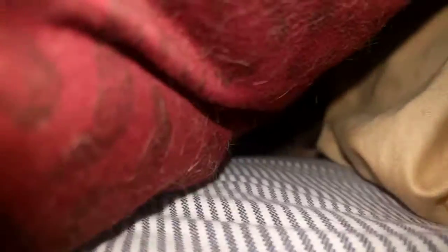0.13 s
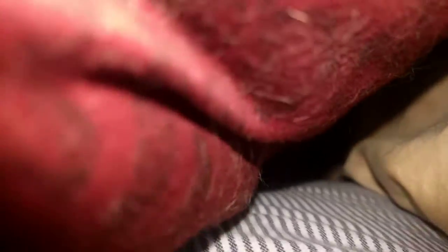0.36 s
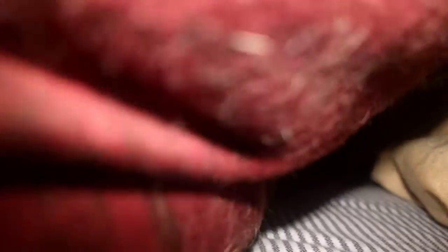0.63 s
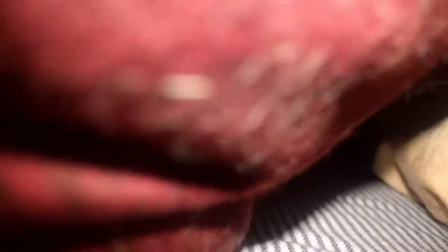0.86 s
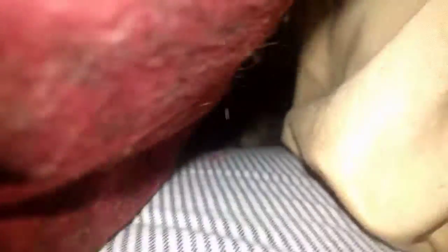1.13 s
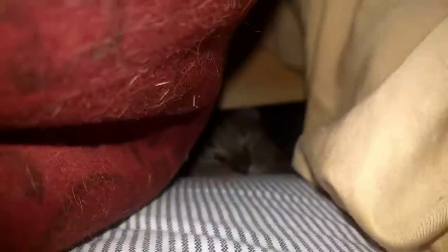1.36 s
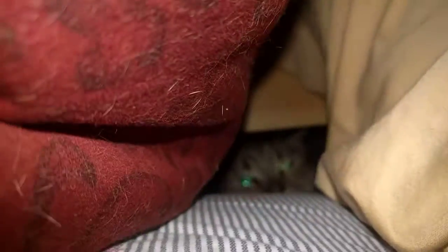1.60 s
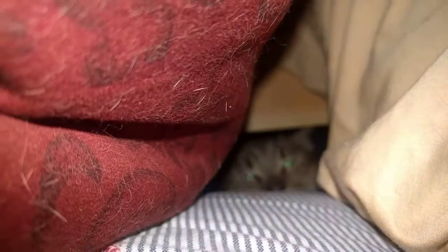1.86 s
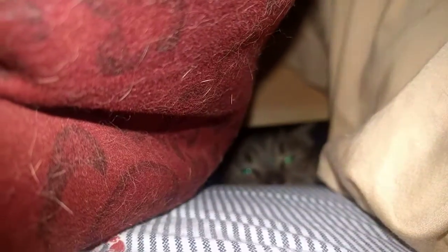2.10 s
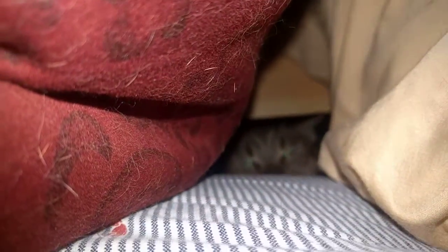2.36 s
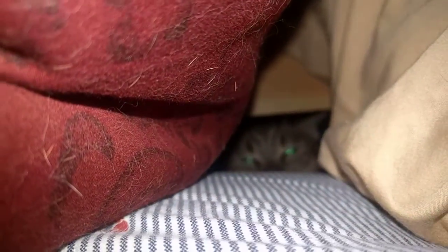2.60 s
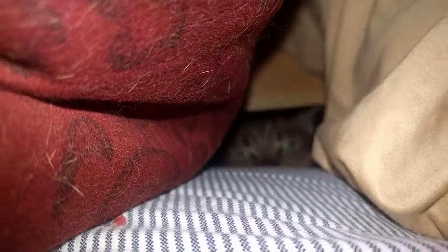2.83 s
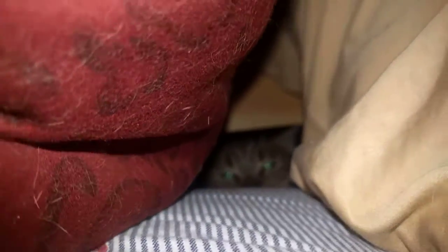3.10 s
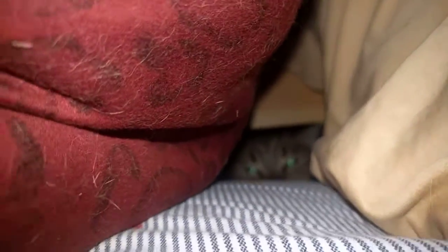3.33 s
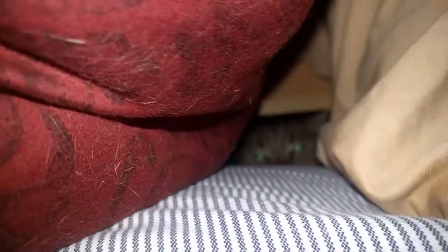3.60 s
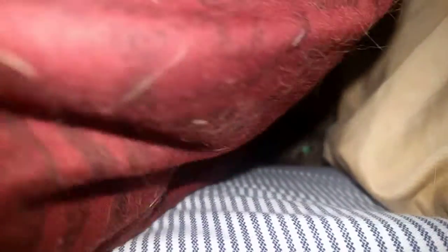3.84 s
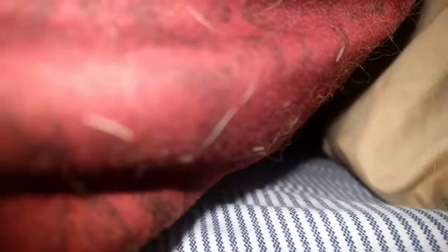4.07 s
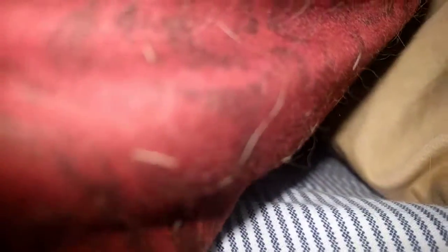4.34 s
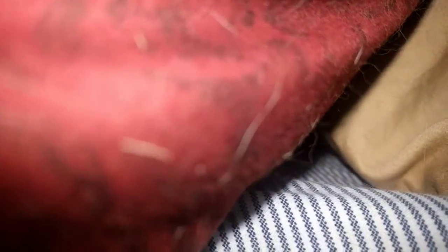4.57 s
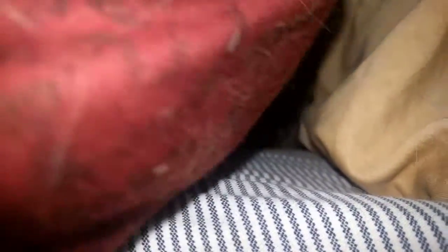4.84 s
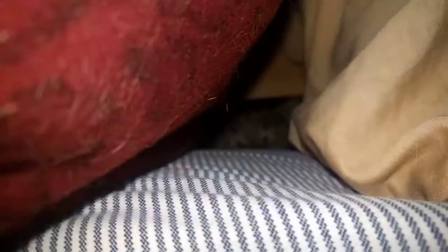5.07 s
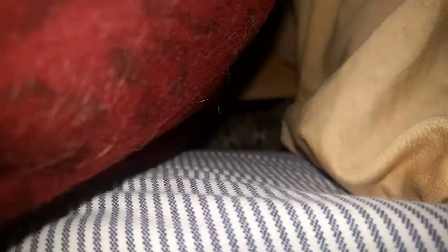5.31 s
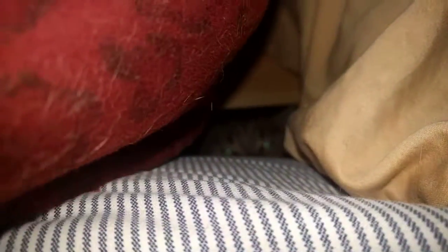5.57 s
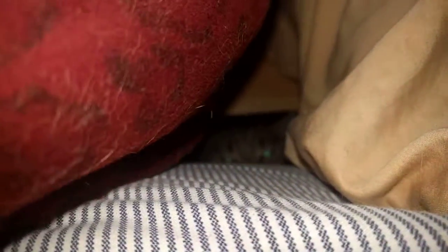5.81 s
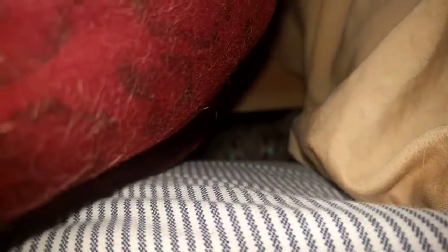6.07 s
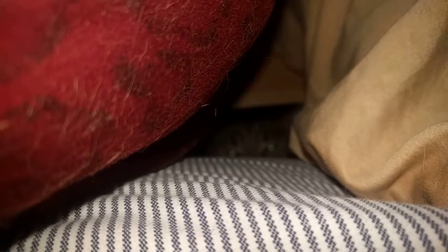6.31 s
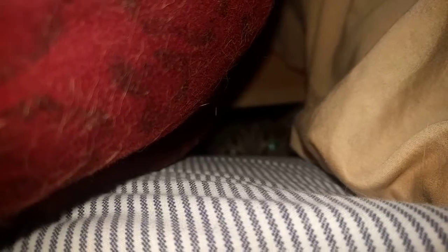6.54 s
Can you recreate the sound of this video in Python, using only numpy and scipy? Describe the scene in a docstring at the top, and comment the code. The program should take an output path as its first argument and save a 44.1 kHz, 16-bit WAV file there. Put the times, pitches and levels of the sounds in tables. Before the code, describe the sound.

Pillows and sheets rustle and scrape close against a small handheld microphone, pause into near silence, then shift again with one sharp hard tap.

```python
"""On a bed in a quiet room: pillows and sheets drag along a small hand-held camera while a cat shifts in a gap.
Bedding slides as plucked-fibre noise, ringing in the pocket between the pillows under a hiss from the weave.
Cloth scrapes and snaps on the case as noise and short forces through its resonances; bumps push the microphone.
Beneath lie the dull rumble of the camera rocking, steady room air, a low hum and a faint electric whine."""
import sys
import numpy as np
from scipy import signal
from scipy.fft import rfft, irfft, next_fast_len
from scipy.io import wavfile
from scipy.ndimage import uniform_filter1d, map_coordinates

SR = 44100
rng = np.random.default_rng(int(sys.argv[2]) if len(sys.argv) > 2 else 0)


def gain_from_db(level_db):
    """Convert decibel levels to linear amplitude factors (20 dB per decade)."""
    decades = np.asarray(level_db, float) / 20
    return 10 ** decades


def transcribe(u):
    """Save the signal u as a 16-bit wav file named by the first command-line argument.

    u: samples, shape (n,) or (channels, n), limited to [-1, 1]; the rate is SR.
    q: integer samples, one column per channel.
    """
    v = np.clip(np.atleast_2d(u).T, -1, 1)
    q = np.round(v * 32767).astype(np.int16)
    wavfile.write(sys.argv[1], SR, q)


N = 294630  # length in samples

# Bedding sliding near the microphone. Each row: start in seconds, build-up in seconds, dying in seconds,
# relative peak level in dB, weave hiss over the swish in relative dB.
SWISHES = [(-.1, 0.053, 0.12, -37, -2), (0.089, .022, 0.015, -29.5, -5.5), (0.147, 0.06, 0.022, -31.5, -10),
           (.2, 0.066, 0.19, -38, -5.5), (0.399, 0.17, 0.078, -37.5, -2.5),
           (0.551, 0.11, 0.089, -34.5, -5.5), (0.768, 0.14, 0.34, -35.5, -0.5),
           (.96, 0.12, 0.11, -35.5, -0.5), (1.13, 0.058, 0.12, -41.5, -1), (1.25, 0.056, 0.1, -49.5, -11),
           (1.36, 0.2, 0.075, -49.5, -0.5), (1.56, 0.056, 0.21, -61.5, -16), (1.81, 0.036, 0.029, -60, 0),
           (1.91, 0.042, .06, -59.5, -6), (1.98, 0.13, .27, -59.5, -6), (2.701, 0.14, 0.017, -41, -10),
           (2.93, 0.035, 0.095, -39, 1.5), (2.97, 0.08, 0.046, -38, -3), (3.102, 0.11, 0.12, -44, -1),
           (3.339, 0.076, 0.053, -48.5, 2), (3.51, 0.057, 0.21, -50, -3.5), (3.601, .165, 0.045, -46, -4),
           (3.818, 0.078, 0.051, -41, -6), (3.989, 0.038, 0.08, -43, -8), (4.05, 0.08, 0.13, -44.5, -12),
           (4.211, 0.053, 0.024, -40.5, -3.5), (4.27, 0.032, 0.073, -53, -2.5),
           (4.37, 0.1, 0.055, -60.5, 4.5), (4.49, 0.063, 0.083, -45, -6), (4.6, 0.16, 0.068, -40, -4),
           (4.85, 0.082, 0.051, -51, -7), (4.923, 0.01, 0.035, -38, -2), (5.28, 0.035, 0.045, -57, -3.5),
           (5.35, 0.04, 0.17, -60.5, 2)]
BUILD_BEND, DYING_BEND = 0.74, 0.77  # powers of the quarter sine that a swish rises and falls along
REST_DB, REST_HISS_DB = -68.5, 0  # the bedding creeping between swishes
# Cloth keeps settling after a swish: time constant, level against the swish and against its hiss.
SETTLE_S, SETTLE_DB, SETTLE_HISS_DB = 0.065, -12.5, -8.5
# Resonances of the pocket between the pillows. Each row: frequency in Hz, width in Hz, relative level in dB.
POCKET = [(2034, 1000, -10), (2836, 1250, -6)]
# Colour of the weave hiss. Each row: frequency in Hz, relative level in dB per Hz.
HISS = [(2500, -14.5), (4000, -3.5), (6000, -5.5), (8000, -18.5), (11000, -38)]
# Peak of the weave hiss with a wide gap between the pillows: frequency in Hz, width in Hz, gain in dB.
GAP_WIDE = (4400, 1100, 2.3)
# The same peak with a narrow gap: frequency in Hz, width in Hz, gain in dB.
GAP_NARROW = (4830, 450, 3.4)
# How narrow the gap is. Each row: time in seconds, narrowness from 0 to 1.
GAP = [(0.6, 0.6), (1.05, 0.9), (2.8, 0.15), (3.7, 0.3), (4.25, 0), (4.4, 0.9)]
# Colour of the fine fizz over the hiss. Each row: frequency in Hz, relative level in dB per Hz.
FIZZ = [(4000, -8.5), (7000, -2), (9800, -9.5), (11500, -9), (16000, -16)]
# Fizz against a swish of -45 dB with hiss at 0 dB, dB per dB of hiss, power of the swish level it follows.
FIZZ_DB, FIZZ_GROWS, FIZZ_POWER = -13, 0.69, 0.87
# Cloth dragging on the case itself. Each row: start in seconds, length in seconds, relative pressure in dB.
STROKES = [(0, 0.16, -36), (0.127, 0.33, -43.5), (0.408, 0.41, -41), (0.795, 0.079, -36.5),
           (0.827, 0.41, -46), (1.402, 0.17, -52), (2.602, 0.035, -47.5), (2.663, 0.025, -45),
           (2.682, 0.21, -43), (2.855, 0.32, -43), (2.958, 0.1, -45), (4.615, 0.24, -50.5),
           (4.923, 0.075, -33), (5.001, 0.09, -40.5), (5.107, 0.06, -49.5), (5.239, 0.05, -54),
           (5.83, 0.065, -52), (5.901, 0.058, -49.5), (5.998, 0.038, -59.5)]
# Resonances of the case under direct contact. Each row: frequency in Hz, width in Hz, relative level in dB.
CASE = [(1483, 270, 2.5), (2420, 1460, 1.5), (4100, 250, -13)]
# Cloth catching and letting go on the case. Each row: time in seconds, relative level in dB.
SLIPS = [(0.1773, -17.5), (0.2044, -22), (0.8007, -18.5), (0.8381, -17.5), (0.8877, -14.5), (1.9438, -41),
         (2.2016, -38), (2.2283, -41), (2.248, -41), (2.293, -41), (2.3086, -35.5), (2.3259, -41),
         (2.3454, -35), (2.3808, -31.5), (2.4966, -40.5), (2.5867, -32.5), (2.612, -27), (2.6498, -38),
         (2.6677, -32), (2.6738, -29), (2.6764, -32), (2.7005, -23), (2.8733, -22), (3.1403, -29),
         (5.808, -39.5), (5.91, -39)]
# Evenly spaced slips over a ribbed weave. Each row: start in seconds, length in seconds,
# first and last relative level in dB.
CHATTER = [(2.8828, .085, -22, -16), (3.0728, .028, -17, -13)]
RIB_S = 0.0141  # from one rib to the next
# Dull ticks of the case settling in the grip. Each row: time in seconds, relative level in dB.
TICKS = [(5.541, -46), (5.58, -50), (5.655, -44.5), (5.797, -39), (5.8226, -43), (6.567, -46)]
# Bumps against the case. Each row: time in seconds, relative level in dB, time scale of the push in seconds.
BUMPS = [(0.107, -24.5, 0.00093), (0.18, -31.5, 0.002), (0.586, -24, 0.00087), (0.835, -24, 0.00063),
         (0.886, -28.5, 0.00062), (1.155, -32, 0.005), (1.501, -37.5, 0.00049), (2.938, -22.5, 0.0011),
         (3.951, -34, 0.0018), (3.974, -33, 0.0037), (4.9078, -12.5, 0.00042), (4.962, -23.5, 0.00075),
         (4.978, -16, 0.0006), (4.984, -22, 0.00028), (4.991, -19.5, 0.0063), (5.81, -37.5, 0.00072),
         (5.9274, -26, 0.0023)]
# One hard tap on the case: time in seconds, relative level in dB.
TAP = (4.9059, 4.5)
# Colour of rumble and shaking on soft bedding. Each row: frequency in Hz, relative level in dB per Hz.
THUD = [(30, 3), (70, 3.5), (150, -6), (400, -13), (1000, -17), (2000, -42.5)]
# Rumble at a motion of -45 dB, dB per dB of motion, span the motion is averaged over, drags over swishes.
ROCK_DB, ROCK_FOLLOWS, ROCK_SPAN_S, DRAG_ROCKS_DB = -49, 0.63, 0.18, 5
# Colour of the background air. Each row: frequency in Hz, relative level in dB per Hz.
ROOM = [(24, -38), (40, -1), (81, -1.5), (372, -5.5), (733, -8), (1760, -18.5), (3200, -60), (4100, -36),
        (7730, -29), (16000, -28.5)]
# Dull resonances of the room air. Each row: frequency in Hz, width in Hz, rms level in dB.
DRONE = [(119, 36, -66), (329.6, 15, -72.5)]
# The electric whine, a few thin tones. Each row: frequency in Hz, relative level in dB.
WHINE = [(3854, -72), (3978, -71), (7531, -83), (7892, -76.5)]


def unit(x):
    """Scaled to rms 1."""
    return x / np.sqrt(np.mean(x ** 2) + 1e-20)


def wobble(rate):
    """A smooth random curve, rate knots a second."""
    knots = rng.standard_normal(int(N * rate / SR) + 4)
    return map_coordinates(knots, [np.arange(N) * rate / SR])


def filtered(x, response):
    """x times a complex response of frequency."""
    m = next_fast_len(N + SR // 2)
    return irfft(rfft(x, m) * response(np.fft.rfftfreq(m, 1 / SR)), m)[:N]


def coloured(x, points):
    """x through (Hz, dB) points on a log frequency axis, rms 1."""
    f, db = np.transpose(points)
    return unit(filtered(x, lambda hz: gain_from_db(np.interp(np.log(hz + 1), np.log(f + 1), db))))


def through(x, modes):
    """x through causal (Hz, width, dB) resonances, all in phase, with dips between them."""
    def response(f):
        return sum(gain_from_db(db) * 1j * f * width / (hz * hz - f * f + 1j * f * width) for hz, width, db in modes)
    return filtered(x, response)


def fibres(rate, spread_db, smooth):
    """Fibres plucking at random, rate a second, a few much harder than the rest, over a smooth share."""
    plucked = rng.random(N) < rate / SR
    plucks = plucked * gain_from_db(spread_db * rng.exponential(size=N).clip(0, 4))
    return unit(unit(plucks) + smooth * rng.standard_normal(N))


def sliding():
    """Bedding swishes in uneven clumps inside the pocket; the weave hisses and fizzes above it."""
    swish_gain, hiss_gain, fizz_gain = swishes()
    clumps = wobble(30) + wobble(90)
    # the pocket's walls sharpen its resonance twice over
    swish = unit(through(through(fibres(rate=2500, spread_db=2.5, smooth=1.4), POCKET), POCKET))
    hiss = coloured(fibres(rate=4000, spread_db=6.5, smooth=1.9), HISS)
    narrow = np.interp(np.arange(N) / SR, *np.transpose(GAP)).clip(0, 1)
    hiss = hiss + (1 - narrow) * through(hiss, [GAP_WIDE]) + narrow * through(hiss, [GAP_NARROW])
    fizz = coloured(rng.standard_normal(N), FIZZ)
    weave = hiss_gain * gain_from_db(-4.5 + 1.3 * wobble(40)) * hiss + fizz_gain * gain_from_db(FIZZ_DB) * fizz
    return gain_from_db(0.61 * clumps) * swish_gain * swish + gain_from_db(0.26 * clumps) * weave


def swishes():
    """Gains of swish, hiss and fizz: each swish builds up, dies and settles; overlapping ones add in power."""
    t = np.arange(N) / SR
    rows = [(gain_from_db(REST_DB), REST_HISS_DB)]
    for start, build, dying, db, hiss_db in SWISHES:
        rise = np.sin(np.pi / 2 * ((t - start) / build).clip(0, 1))
        fall = np.sin(np.pi / 2 * ((start + build + dying - t) / dying).clip(0, 1))
        rows.append((gain_from_db(db) * rise ** BUILD_BEND * fall ** DYING_BEND, hiss_db))

    def total_power(grows):
        return sum((gain * gain_from_db(grows * hiss_db)) ** 2 for gain, hiss_db in rows)

    keep = np.exp(-1 / (SETTLE_S * SR))

    def settled(power, db):
        tail = signal.lfilter([1 - keep], [1, -keep], power)
        return np.sqrt(power + gain_from_db(db) ** 2 * tail)

    swish, hiss, fizz = total_power(0), total_power(1), total_power(FIZZ_GROWS)
    follow = (swish / gain_from_db(-45) ** 2) ** ((FIZZ_POWER - 1) / 2)  # fizz varies a little less than the swish
    return settled(swish, SETTLE_DB), settled(hiss, SETTLE_HISS_DB), settled(fizz * follow ** 2, SETTLE_DB)


def strokes():
    """A drag scrapes the case and shakes it."""
    drag = pressure()
    scrape = unit(case(fibres(rate=1800, spread_db=2.5, smooth=0.94)))
    buzz = unit(through(fibres(rate=400, spread_db=4, smooth=0.3), CASE[:1]))
    shake = coloured(gain_from_db(3.4 * wobble(60)) * rng.standard_normal(N), THUD)
    light = gain_from_db(-31.5) * np.sqrt(drag) * buzz  # stands out in light drags
    heavy = drag ** 2 * gain_from_db(34.0) * shake  # heavy drags shake far more
    return light + drag * gain_from_db(1.4 * wobble(70)) * scrape + heavy


def pressure():
    """How hard cloth drags on the case: each drag builds up, holds, then eases off a little more slowly."""
    t = np.arange(N) / SR
    total = np.zeros(N)
    for start, length, db in STROKES:
        rise = (t - start) / length / 0.15
        fall = (start + length - t) / length / 0.22
        total += gain_from_db(db) * np.clip(np.minimum(rise, fall), 0, 1)
    return total


def patchy(x, depth_db):
    """The colour of the cloth noise varies at random in patches several hundred hertz wide."""
    z = signal.stft(x, nperseg=256)[2]
    field = uniform_filter1d(rng.standard_normal(z.shape), size=4, axis=0)  # along frequency
    field = uniform_filter1d(field, size=12, axis=1)  # along time
    return signal.istft(z * gain_from_db(depth_db * unit(field)), nperseg=256)[1][:N]


def case(x):
    """The case rings under any force on it; soft cloth drives it only weakly above a few kilohertz."""
    def softness(hz):
        return 1 / (1 - (hz / 6200) ** 2 + 1.1j * hz / 6200) ** 2 + 0.14
    return filtered(through(x, CASE), softness)


def slips():
    """Each release is one sharp snap inside a short fray of smaller ones and a small recoil of the camera."""
    force, recoil, t = np.zeros(N + SR), np.zeros(N + SR), np.arange(SR // 30) / SR
    lead = SR // 250  # samples of fraying before the snap
    late = t - t[lead]
    events = list(SLIPS)
    for start, length, first, last in CHATTER:
        for along in RIB_S * np.arange(round(length / RIB_S) + 1):
            events.append((start + along, first + (last - first) * along / length))
    for s, db in events:
        fray_gain = gain_from_db(-23 - 20 * np.maximum(late / 0.007, -late / 0.002))
        fray = fray_gain * rng.standard_normal(len(t)) * rng.exponential(size=len(t))
        fray[lead:lead + 2] = 1, -rng.uniform(0.12, 0.39)  # each snap is randomly duller or brighter
        force[round(s * SR) - lead:][:len(t)] += gain_from_db(db + 16) * fray
        recoil[round(s * SR):][:len(t)] -= gain_from_db(db - 2) * (t / 0.0014) ** 2 * np.exp(-t / 0.0012)
    return case(force[:N]) + recoil[:N]


def ticks():
    """Soft ticks ring mostly the lowest case resonance."""
    force, t = np.zeros(N + SR), np.arange(SR // 100) / SR
    for s, db in TICKS:
        force[round(s * SR):][:len(t)] += gain_from_db(db + 12.0 - 20 * t / 0.0031) * rng.standard_normal(len(t))
    # many smaller ones in random clusters
    faint = gain_from_db(-59.0 + 4.4 * wobble(4)) * fibres(rate=130, spread_db=2.5, smooth=0)
    return case(through(force[:N] + faint, [(1450, 470, 0)]))


def bumps():
    """A blow squeezes the air at the microphone once and lets it swing back; the hard tap also cracks."""
    push, crack, t = np.zeros(N + SR), np.zeros(N), np.arange(SR // 10) / SR
    for s, db, length in BUMPS:
        u = t / length
        push[round(s * SR):][:len(t)] -= gain_from_db(db + 9.5) * u * np.exp(-u) * (2 - u)
    tap_s, tap_db = TAP
    crack[round(tap_s * SR):][:5] = gain_from_db(tap_db) * np.hanning(7)[1:-1] / 3
    crack = through(crack, [(3050, 3200, -1.6), (5330, 1600, 1)])
    return push[:N] + through(crack, [(4630, 3600, 2), (900, 900, 8.2)])


def rocking():
    """Dull lumpy rumble of the camera moving on soft bedding; it follows swishes and drags, smoothed briefly."""
    moving = swishes()[0] + gain_from_db(DRAG_ROCKS_DB) * pressure()
    motion = uniform_filter1d(moving, round(ROCK_SPAN_S * SR)) / gain_from_db(-45)
    lumps = gain_from_db(1.5 * wobble(25) + 1.8 * wobble(70))
    return gain_from_db(ROCK_DB) * motion ** ROCK_FOLLOWS * coloured(lumps * rng.standard_normal(N), THUD)


def room():
    """Steady background air with a dull drone, a wavering low hum and the thin whine."""
    t = np.arange(N) / SR
    air = gain_from_db(-62.0) * coloured(rng.standard_normal(N), ROOM)
    hum = gain_from_db(-54.0 + 2.8 * wobble(8.1)) * np.sin(2 * np.pi * 59.2 * t + 1.23 * wobble(2.81))
    drone, whine = np.zeros(N), np.zeros(N)
    for hz, width, db in DRONE:
        mode = [(hz, width, 0)]
        drone += gain_from_db(db) * unit(through(through(rng.standard_normal(N), mode), mode))
    for hz, db in WHINE:
        cycles = hz * t + rng.random() + 0.48 * wobble(26)
        whine += gain_from_db(db - 3) * np.sin(2 * np.pi * cycles)
    return air + drone + hum + whine


def scene():
    """Everything reaches one microphone."""
    cloth = patchy(sliding() + strokes(), depth_db=2.0)
    return (cloth + slips() + ticks() + bumps() + rocking() + room())[None]


def band_limit(x):
    """A steep low-pass at the top of the band."""
    return signal.sosfilt(signal.butter(12, 16760, fs=SR, output="sos"), x)


def record(dry):
    """The input cuts the deepest bass steeply, so that bumps ring out, and most of the top; it sits off zero."""
    def input_response(hz):
        ratio = 45 / (hz + 1e-3)  # bass corner at 45 Hz
        low_cut = (1 / (1 - ratio ** 2 - 1j * 1.49 * ratio)) ** 2
        return low_cut * np.where(hz < 15800, 1, 0.06)
    mix = filtered(dry[0], input_response)[None] - 0.0009
    return band_limit(mix)


dry = scene()
out = record(dry)
transcribe(out)
```